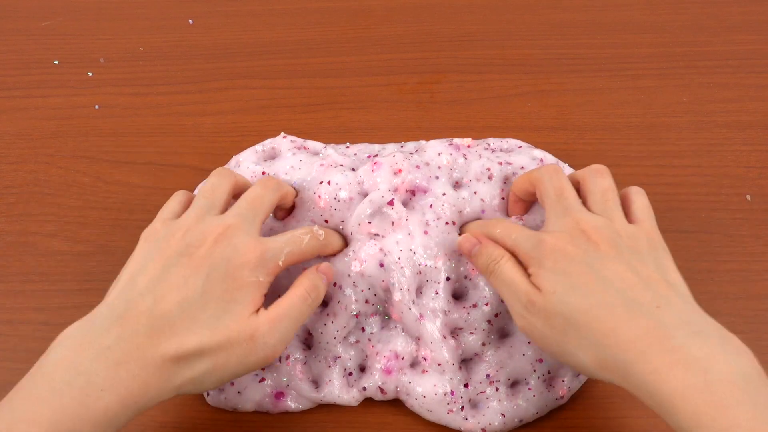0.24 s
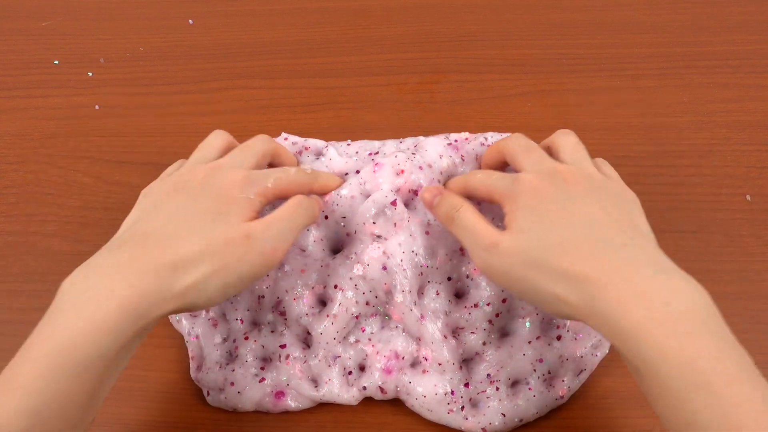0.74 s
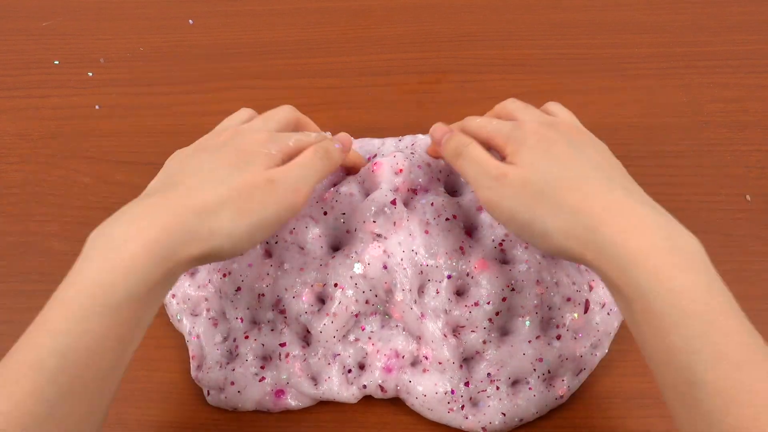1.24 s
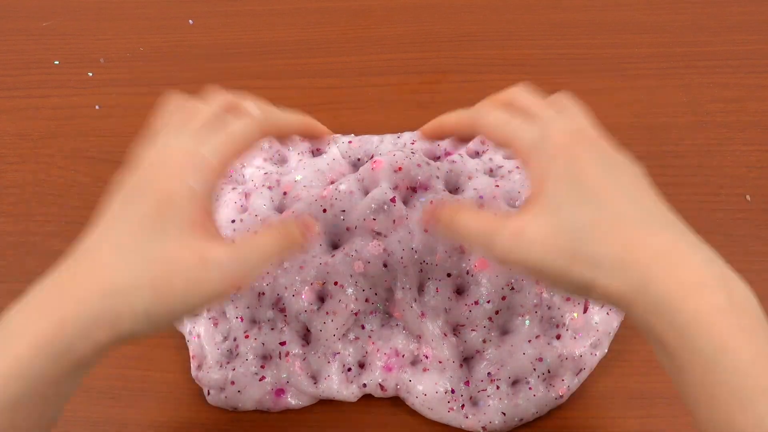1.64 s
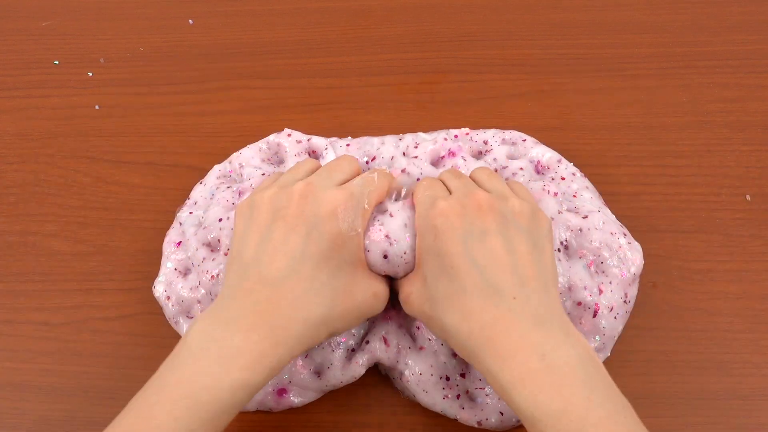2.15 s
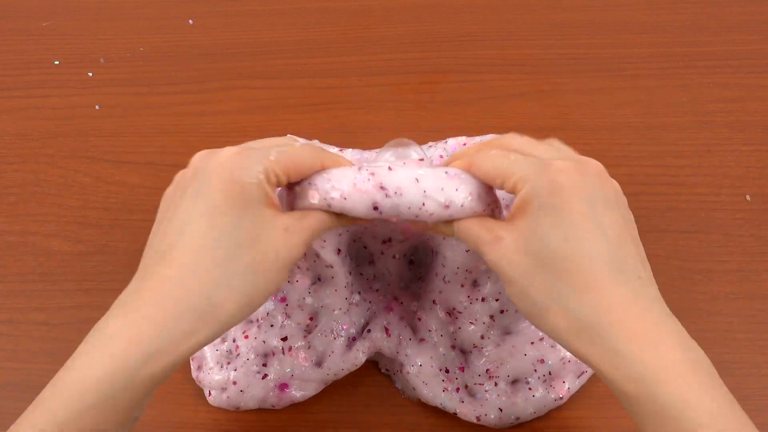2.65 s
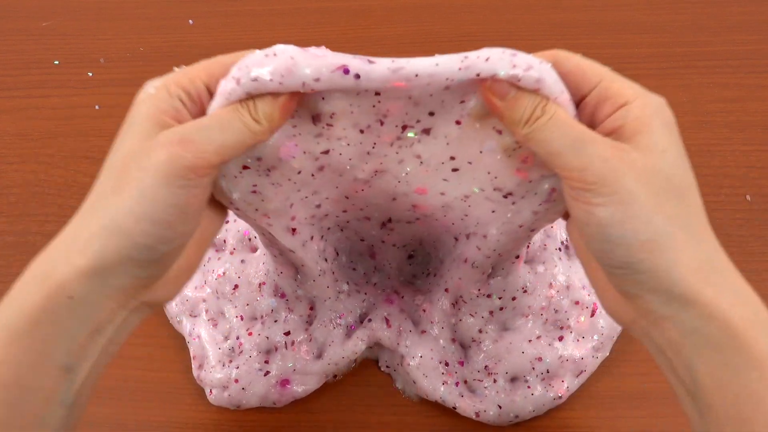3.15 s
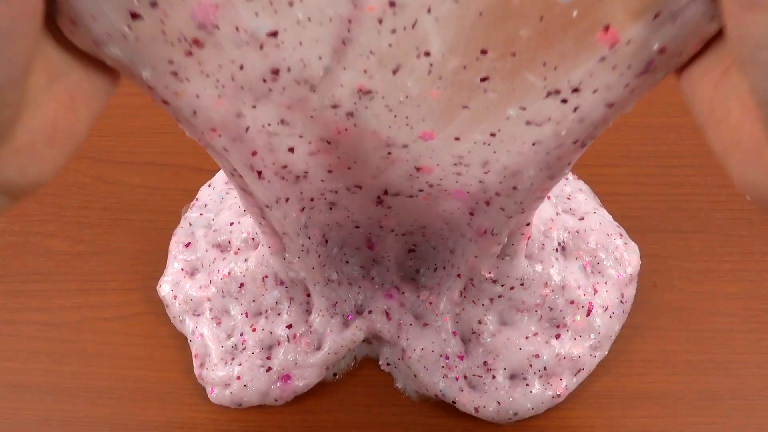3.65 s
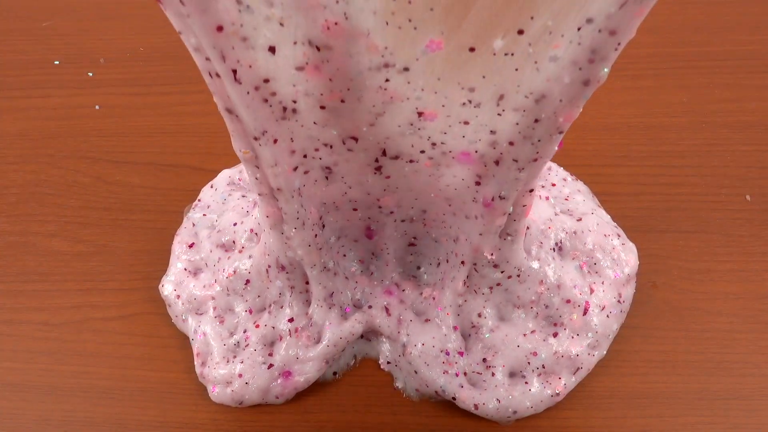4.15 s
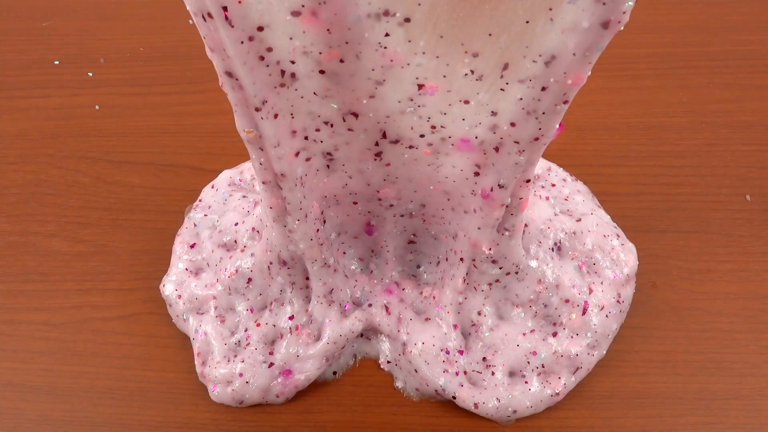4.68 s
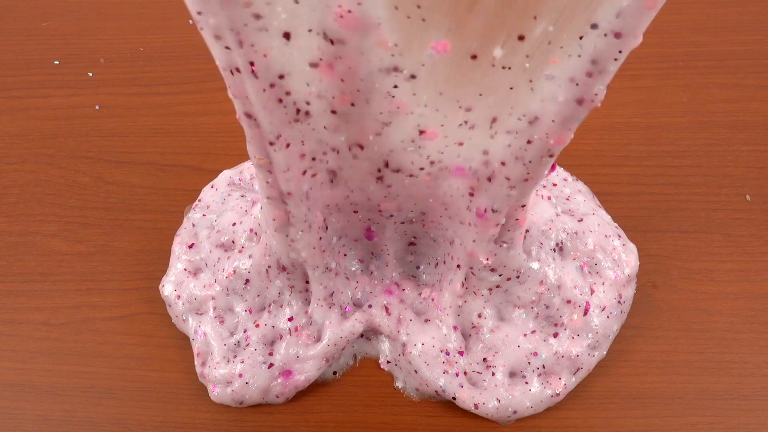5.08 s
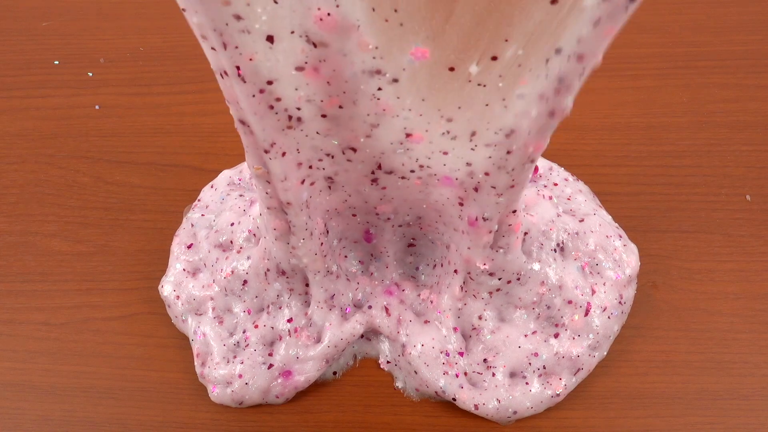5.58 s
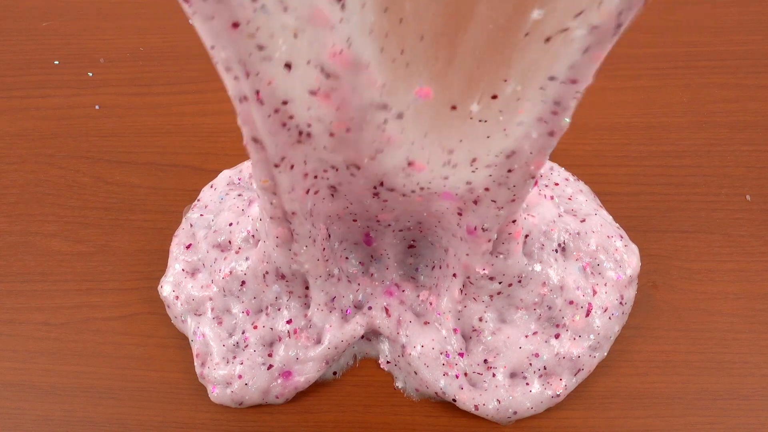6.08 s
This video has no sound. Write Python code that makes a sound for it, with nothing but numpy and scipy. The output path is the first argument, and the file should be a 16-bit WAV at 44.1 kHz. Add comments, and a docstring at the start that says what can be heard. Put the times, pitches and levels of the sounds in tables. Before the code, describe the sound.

A small quiet room with faint hiss and slow, low air rumble, heard very close in stereo. A tiny tick comes at 0.24 s, then a tight cluster of bright pops with a wet crackling press and soft thud around 0.45 s. A stronger pair snaps at 1.0 s with another squelch; smaller pops and a sticky press follow at 1.5 s. At 2.05 s a big bubble cracks, the loudest event, piercing and bright with a very quick splashy tail. From 2.2 to 2.7 s come clustered pops, squelchy presses, peels and dull thuds. From 2.8 to 4.7 s mostly delicate fizzing crackle remains, with isolated faint ticks. At 4.8 s lower, wetter pops and presses return with sticky peels and deep air puffs. A sharp pop hits at 5.57 s, then a soft peel at 5.8 s, a last small pop at 5.97 s, and fading crackle until 6.3 s.

```python
"""Two hands work wet slime on a table; noise makes the steady hush and slow air rumble in a small quiet room.
At first damped resonances give single pops; swarms of random clicks give crackling presses and peels. Near two
seconds a big bubble cracks in several resonances; a dense bright fizz of snaps follows, rises and dies away
fast. More presses with soft low thuds follow, then a sparser middle leaves mostly fine crackle; near five
seconds the peels return with low sine waves of air, and one more sharp pop and a long peel lead to the end."""
import sys
import numpy as np
from scipy import signal
from scipy.fft import rfft, irfft, next_fast_len
from scipy.io import wavfile

SR = 44100
rng = np.random.default_rng(int(sys.argv[2]) if len(sys.argv) > 2 else 0)


def wrap_up_sound(samples):
    """Save the sound to the file named by the first command line argument, as 16-bit audio."""
    columns = np.atleast_2d(samples).T
    # keep every value between -1 and 1, then stretch to whole-number steps
    tamed = np.clip(columns, -1, 1)
    steps = np.round(tamed * 32767).astype(np.int16)
    wavfile.write(sys.argv[1], SR, steps)


N = 278712  # samples in the scene

# Slow air stirred at the microphone. Each row: time in seconds, level in dB before a common trim,
# left against right in dB.
AIR_DRAUGHT = [(0.0, -46.5, 3.5), (0.65, -51, -1), (0.81, -48, 5), (1.02, -47.5, 1.5), (1.48, -52.5, 3),
               (1.64, -48, 1.0), (1.71, -50, 9), (2.48, -51.5, -2), (3.1, -54, 4), (4.82, -54, 7.5),
               (5.0, -43.5, 12.5), (5.23, -46.5, 7.5), (5.69, -49, 11.0), (6.18, -47.5, -0.5),
               (6.23, -44, 3.5), (6.32, -42.5, 0.5)]
# Spectrum of that air. Each row: frequency in Hz, relative density in dB per Hz.
AIR_SPECTRUM = [(10, -9), (25, 2), (58, 0), (78, -5.5), (105, -15), (160, -24), (300, -46), (700, -71.5)]
# Spectrum of the quiet room and microphone hiss. Each row: frequency in Hz, relative density in dB per Hz.
HUSH_SPECTRUM = [(65, -41.5), (110, -3.5), (228, -3.5), (293, -7.5), (346, -7.5), (384, -9.5), (583, -12.5),
                 (660, -12.5), (848, -14), (960, -14.5), (2080, -19), (16000, -28)]
HUSH_DB = -64.5

# Swings of the hands and the stretched sheet that push air. Each row: start in seconds,
# level in dB before a common trim and the channel gains, frequency in Hz.
AIR_SWINGS = [(0.656, -39.5, 27), (4.976, -37.5, 42.7), (5.073, -43, 80.5), (5.191, -46.5, 131),
              (5.328, -39, 55), (5.444, -45, 33), (5.601, -41, 29.3), (5.883, -44, 59.5)]

# Crackle of tiny bubbles under strain. Each row: time in seconds, level in dB before the treble filters.
STRAIN_LEVEL = [(0, -93), (.2, -78), (.85, -84), (1.4, -73), (1.75, -75), (2.7, -71.5), (2.83, -64),
                (3.0, -70), (3.55, -76), (3.9, -71), (4.2, -85), (4.701, -82), (5.699, -65.5), (6.32, -74)]

# Sticky skin peeling off fingers or table. Each row: start in seconds, length in seconds,
# level in dB before the treble filters, centre in Hz.
SKIN_PEELS = [(0.653, 0.034, -67.5, 10500), (1.535, .05, -60, 3920), (2.286, 0.061, -53, 3900),
              (2.411, 0.13, -56, 4200), (2.544, 0.1, -61.5, 3870), (4.822, 0.12, -62.5, 2080),
              (4.953, 0.052, -55, 4340), (5.069, 0.12, -61, 2600), (5.183, 0.072, -61, 2640),
              (5.353, .11, -61, 3700), (5.636, 0.024, -56.5, 7000), (5.801, 0.16, -63.5, 5000)]
PEEL_Q = 0.12

# Fingers pressing in, or a fold flopping down. Each row: start in seconds, length in seconds,
# crackle level in dB, crackle centre in Hz, thud level in dB, thud centre in Hz
# (levels before the treble filters).
FINGER_PRESSES = [(0.435, 0.015, -55, 5800, -61, 260), (0.456, 0.052, -48.5, 3570, -49.5, 173),
                  (0.981, 0.017, -58, 6100, -56, 230), (1.0, .045, -47, 5970, -51, 221.2),
                  (1.541, 0.032, -57.5, 3500, -57, 300), (1.574, 0.044, -49, 1730, -53.5, 253),
                  (2.177, .017, -69, 1800, -57, 450), (2.32, 0.012, -53, 3300, -54, 380),
                  (2.441, 0.019, -61, 1700, -56.5, 280), (2.488, 0.041, -59, 2320, -58, 250),
                  (2.654, 0.033, -62, 3470, -63.5, 260), (4.883, 0.021, -56, 990, -50, 200),
                  (5.155, 0.017, -48.5, 2830, -55, 192)]
CRACKLE_Q = .2
# Trapped air: level against the thud, length against the press
GURGLE_HZ, GURGLE_Q, GURGLE_DB, GURGLE_LASTS = 595, 0.47, -7, 1.2
THUD_LASTS = 2.3  # thud length against the press
PUFF_HZ, PUFF_DB, PUFF_LAG_S = 45, -3.5, .02  # air pushed aside by the hand: level against the thud

# Single air pockets bursting. Each row: start in seconds, energy in dB over 0.88 ms before the treble
# filters, ring in Hz, sharpness Q, level of the following fizz in dB against the pop.
POCKET_BURSTS = [(0.2405, -44, 10700, 1.1, -20), (0.4447, -34.5, 8440, 0.79, -18),
                 (0.4605, -34.5, 5030, 1.3, -17), (0.4778, -34.5, 5800, 4, -15.5),
                 (0.982, -39.5, 3080, 0.067, -9), (0.988, -24, 9300, 2, -24),
                 (1.0195, -25, 6220, 2.1, -16.5), (1.2528, -42.5, 10600, .8, -18),
                 (1.487, -44, 990, 0.31, -11.5), (1.5466, -44, 4600, 0.89, -26),
                 (2.0159, -45.5, 10900, .8, -12.5), (2.18, -42.5, 1810, 2.3, -12.5),
                 (2.207, -45, 5600, 0.32, -22), (2.2689, -46, 1210, 0.92, -28),
                 (2.2824, -32.5, 4600, 0.46, -29), (2.2826, -38, 2390, 9, -25),
                 (2.3254, -34, 4100, .6, -24), (2.4496, -33.5, 3240, 5, -19.5),
                 (2.4955, -37, 1460, 1.2, -24), (2.6653, -43, 5250, 6, -15.5),
                 (2.879, -41.5, 7200, 2.2, -26), (2.908, -47.5, 6800, 3.1, -34),
                 (3.4234, -40, 11400, 0.27, -12.5), (3.8257, -42, 10000, 0.64, -21),
                 (4.8858, -35, 1400, 0.55, -16), (4.8883, -33, 915, 0.66, -28),
                 (4.9837, -45, 1090, 1.9, -14), (5.0752, -43, 1100, 0.3, -15), (5.131, -50.5, 2370, 2, -12),
                 (5.5479, -37, 6030, 0.53, -32), (5.5734, -24, 7340, .68, -49),
                 (5.5738, -41, 1420, 3.6, -28), (5.6497, -44, 5870, 3.7, -28),
                 (5.9688, -32.5, 4100, 1.24, -39)]
FIZZ_S = 0.022  # length of the torn film's crackle

# Resonances of the big bubble. Each row: frequency in Hz, energy in dB over 0.88 ms before the treble
# filters, sharpness Q.
BUBBLE_RESONANCES = [(1400, -30.5, 0.38), (5500, -16, 6), (10700, -8.5, 5.4)]
BIG_BUBBLE_S, BIG_TAIL_DB, BIG_TAIL_HZ, BIG_TAIL_Q = 2.0456, -32.5, 7600, 4.3
BIG_RISE_S, BIG_TAIL_T60 = 0.0045, 0.066  # rise time and 60 dB decay time of the bright tail, in seconds

# Treble response of the microphone. Each row: frequency in Hz, gain in dB.
CAPSULE_RESPONSE = [(100, -2.5), (2600, -1), (3400, 0), (4300, 1), (5000, 2.5), (6500, -1.5), (8000, -4),
                    (9300, -1), (11000, 1.5), (13000, 0), (16000, 0.5)]
# Scatter off table and hands. Each row: frequency in Hz, level against the direct sound in dB.
NEAR_RESPONSE = [(200, 1), (1500, -5), (3000, -5.5), (5700, -2.5), (9000, -2), (11000, -6), (15000, -5)]
# Late room sound. Each row: frequency in Hz, level against the direct sound in dB.
LATE_RESPONSE = [(150, 1), (400, -7.5), (1000, -9.5), (2800, -11.5), (6000, -13.5), (13000, -22)]
# Reverberation of the room. Each row: frequency in Hz, 60 dB decay time in seconds.
ROOM_DECAY = [(150, .6), (400, 0.69), (1000, 0.43), (2800, 0.29), (6000, 0.24), (13000, 0.27)]
EDGE_HZ = 16300  # upper band limit


def gain_of(db):
    """The decibel law: 20 dB is a factor of ten in amplitude."""
    return 10 ** (np.asarray(db) / 20)


def evened(x):
    """Normalization: the root-mean-square amplitude becomes 1."""
    return x / np.sqrt(np.mean(x ** 2) + 1e-20)


def with_energy(x, db, seconds):
    """Energy is power times time: x gets that of a sound of rms level db lasting this long."""
    return x * gain_of(db) * np.sqrt(seconds * SR / (np.sum(x ** 2) + 1e-20))


def read(points, hz):
    """Linear interpolation of a table along a logarithmic frequency axis."""
    f, value = np.transpose(points)
    return np.interp(np.log(hz + 1), np.log(f + 1), value)


def add(mix, s, sound):
    """Superposition: the sound is summed into the mix from time s."""
    part = mix[round(s * SR):][:len(sound)]
    part += sound[:len(part)]


def coloured(x, points):
    """Linear filtering: each frequency of x is scaled by a (Hz, dB) table."""
    n = x.shape[-1]
    gains = gain_of(read(points, np.fft.rfftfreq(n, 1 / SR)))
    return irfft(rfft(x) * gains, n)


def ring(x, hz, q, lead=4):
    """Damped resonance: an air pocket answers most strongly at its own frequency."""
    x = np.pad(x, (lead, SR // 20))  # samples for the rise, 50 ms for the ring
    n = next_fast_len(2 * len(x))
    f = np.fft.rfftfreq(n, 1 / SR) + 0.0012  # avoids division by zero
    response = 1 / (1 + 1j * q * (f / hz - hz / f))
    return irfft(rfft(x, n) * response, n)[:len(x)]


def swell(count, crest):
    """Envelope of a stroke: power rises linearly to the crest (a share of its length), then falls."""
    return np.sqrt(np.interp(np.linspace(0, 1, count), [0, crest, 1], [0, 1, 0]))


def wave(db, hz, cycles=1.53):
    """A pressure pulse: a short sine under a smooth window."""
    t = np.arange(round(cycles / hz * SR)) / SR
    return gain_of(db) * evened(np.sin(2 * np.pi * hz * t) * np.hanning(len(t)))


def swarm(strength, hz, q, snaps_per_s, spread_db, octaves=1.2, bubble_q=6, bubble_db=5, count=9):
    """A random point process: uneven snaps excite resonances of several pitches inside a broader one."""
    draws = np.random.default_rng(rng.integers(2 ** 30)).random((len(strength), 3))
    chance, size, pocket = draws.T
    sizes = gain_of(spread_db * np.minimum(-np.log(1 - size), 3.5))
    snaps = (chance < snaps_per_s / SR) * sizes * strength
    steps = 2 * (np.arange(count) + rng.random(count)) / count - 1
    pitches = np.minimum(hz * 2 ** (octaves * steps), SR / 3)
    group = (pocket * count).astype(int)
    rings = [ring(snaps * (group == k), pitch, bubble_q) for k, pitch in enumerate(pitches)]
    bubbles = gain_of(bubble_db) * sum(rings)
    add(bubbles, 0, snaps * .5)  # the bare snaps
    return ring(bubbles, hz, q)


def squelch(seconds, db, hz, q, crest):
    """Wet friction: a dense swarm of snaps fuses into one stroke that swells and falls."""
    stroke = swell(max(round(seconds * SR), 3), crest)
    return with_energy(swarm(stroke, hz, q, snaps_per_s=1500, spread_db=4.5), db, seconds)


def thud(seconds, db, hz, q=0.57, crest=0.22, shoves_per_s=1500, taper=2.4):
    """Inertia of a soft mass: irregular shoves are dulled by two equal damped resonances."""
    n = max(round(seconds * SR), 3)
    chance, size = np.random.default_rng(rng.integers(2 ** 30)).random((n, 2)).T
    push = (chance < shoves_per_s / SR) * (2 * size - 1) * swell(n, crest) ** taper
    return with_energy(ring(ring(push, hz, q), hz, q), db, seconds)


def pop(db, hz, q, opening=0.21):
    """Impulse excitation: a breaking film gives one broad snap, which rings the opened pocket."""
    snap = ring(np.ones(1), hz, q * opening)[:SR // 100]
    return with_energy(ring(snap, hz, q), db, 0.00088)


def stereo_noise(tone, likeness):
    """Partial coherence: two coloured noises share some power; their mean has rms 1."""
    z = rng.standard_normal((3, N))
    pair = coloured(np.sqrt(likeness) * z[0] + np.sqrt(1 - likeness) * z[1:], tone)
    return pair / np.std(pair.mean(0))


def background(draught_db=-4.0):
    """Broadband noise: a steady hush lies under low air movement of changing level and balance."""
    s, level_db, pan_db = np.transpose(AIR_DRAUGHT)
    t = np.arange(N) / SR
    gains = [gain_of(np.interp(t, s, level_db + draught_db + side * pan_db / 2)) for side in (1, -1)]
    draught = stereo_noise(AIR_SPECTRUM, likeness=0.49) * gains
    hush = gain_of(HUSH_DB) * stereo_noise(HUSH_SPECTRUM, likeness=0.12)
    return draught + hush


def wobbles(level_db=-5, left_db=5.0):
    """Displaced air: each swing sends a low pressure pulse, stronger at the left microphone."""
    out = np.zeros(N)
    for s, db, hz in AIR_SWINGS:
        add(out, s, wave(db + level_db, hz))
    return out * gain_of([[left_db], [-left_db]])


def fine_crackle(hz=5200, q=0.82):
    """Random rupture: tiny bubbles burst at a steady mean rate, louder under strain."""
    ticks = swarm(np.ones(N), hz, q, snaps_per_s=260, spread_db=5.0, count=5)[:N]
    level_db = np.interp(np.arange(N) / SR, *np.transpose(STRAIN_LEVEL))
    return evened(ticks) * gain_of(level_db)


def peels():
    """Adhesion giving way: the skin lets go in strokes of broad, soft crackle."""
    out = np.zeros(N)
    for s, seconds, db, hz in SKIN_PEELS:
        add(out, s, squelch(seconds, db, hz, PEEL_Q, crest=0.26))
    return out


def presses(table_hz=450, table_q=2.3, table_db=-8.5):
    """Compression: skin crackles, trapped air gurgles, the mass thuds and knocks the table, air puffs out."""
    wet, mass, air = np.zeros((3, N))
    for s, seconds, crackle_db, crackle_hz, thud_db, thud_hz in FINGER_PRESSES:
        add(wet, s, squelch(seconds, crackle_db, crackle_hz, CRACKLE_Q, crest=0.23))
        gurgle_db = thud_db + GURGLE_DB
        add(wet, s, squelch(seconds * GURGLE_LASTS, gurgle_db, GURGLE_HZ, GURGLE_Q, crest=.35))
        add(mass, s, thud(seconds * THUD_LASTS, thud_db, thud_hz))
        add(air, s + PUFF_LAG_S, wave(thud_db + PUFF_DB, PUFF_HZ))
    knock = gain_of(table_db) * ring(mass, table_hz, table_q)[:N]
    return wet + mass + knock + air


def pops():
    """Sudden release: each pocket bursts, and its torn film fizzes briefly around the same pitch."""
    out = np.zeros(N)
    for s, db, hz, q, fizz_db in POCKET_BURSTS:
        add(out, s, pop(db, hz, q))
        add(out, s, squelch(FIZZ_S, db + fizz_db, hz, q, crest=0.34))
    return out


def big_bubble(snaps_per_s=4000, spread_db=2.5):
    """Impulse and random rupture: a bubble cracks in several resonances, then a dense bright fizz of snaps dies
    away fast."""
    out = np.zeros(N)
    for hz, db, q in BUBBLE_RESONANCES:
        add(out, BIG_BUBBLE_S, pop(db, hz, q, opening=0.19))
    t = np.arange(SR // 20) / SR
    envelope = np.minimum(t / BIG_RISE_S, 1) * gain_of(-60 * t / BIG_TAIL_T60)
    tail = swarm(envelope, BIG_TAIL_HZ, BIG_TAIL_Q, snaps_per_s, spread_db, octaves=1.0)
    add(out, BIG_BUBBLE_S, with_energy(tail, BIG_TAIL_DB, BIG_TAIL_T60))
    return out


def soften(x, top_hz=12800):
    """Finite rupture time: a wet film tears gradually, which rounds off the top treble."""
    return signal.sosfilt(signal.butter(3, top_hz, fs=SR, output="sos"), x)


def reflections(likeness, first_s, size=22050, spacing=7):
    """Scattering: sparse echoes of random sign and size, on average one per spacing samples."""
    present = rng.random((3, size)) < 1 / spacing
    taps = rng.standard_normal((3, size)) * present * (np.arange(size) > first_s * SR)
    return np.sqrt(likeness) * taps[0] + np.sqrt(1 - likeness) * taps[1:]


def room(x, near_t60=0.093, near_likeness=0.43, late_likeness=0.23):
    """Reverberation: quick scatter from table and hands, then a tail whose decay depends on frequency."""
    near = reflections(near_likeness, first_s=.0008, spacing=18)
    near = near * gain_of(-60 * np.arange(near.shape[1]) / SR / near_t60)
    hz, t, z = signal.stft(reflections(late_likeness, first_s=0.0087), SR, nperseg=256)
    t60 = read(ROOM_DECAY, hz)[:, None]
    decayed = z * gain_of(-60 * t / t60) / np.sqrt(t60)  # the root evens the energy of long and short decays
    late = signal.istft(decayed, SR, nperseg=256)[1]
    out = 0
    for echoes, tone in (near, NEAR_RESPONSE), (late, LATE_RESPONSE):
        echoes = echoes / np.linalg.norm(echoes, axis=1, keepdims=True)
        out = out + signal.fftconvolve(coloured(x, tone)[None], echoes, axes=1)[:, :N]
    return out


def scene(right_db=0.47, lag_s=1.0e-5):
    """Stereo by level and delay: the slime is slightly louder at the right and a hair later there."""
    sources = pops() + big_bubble() + presses() + peels() + fine_crackle()
    slime = coloured(soften(sources), CAPSULE_RESPONSE)
    left, right = slime + room(slime)
    delay = np.exp(-2j * np.pi * np.fft.rfftfreq(N, 1 / SR) * lag_s)
    right = irfft(rfft(right) * delay, N)
    balanced = np.array([left, right]) * gain_of([[-right_db], [right_db]])
    return balanced + wobbles() + background()


def record(dry):
    """Overload and band limit: any peak beyond the input's range is clipped, then the top treble is cut."""
    held = np.clip(dry, -.87, .87)
    lowpass = signal.firwin(255, EDGE_HZ, window=("kaiser", 8), fs=SR)
    return signal.oaconvolve(held, lowpass[None], "same")


dry = scene()
out = record(dry)
wrap_up_sound(out)
```